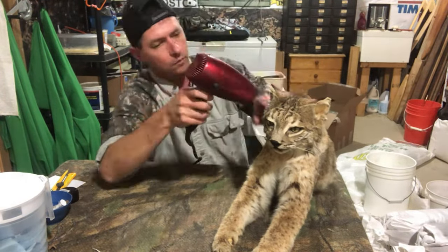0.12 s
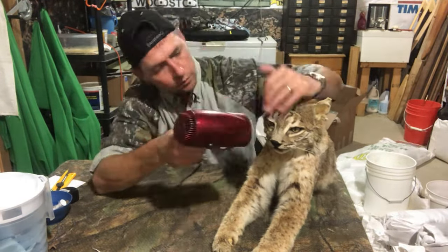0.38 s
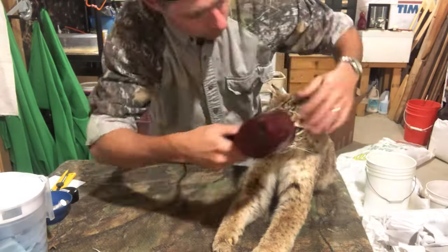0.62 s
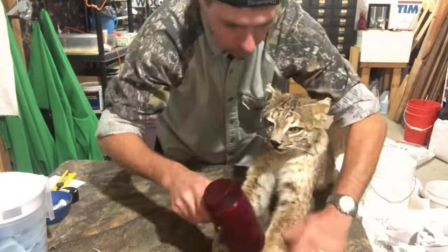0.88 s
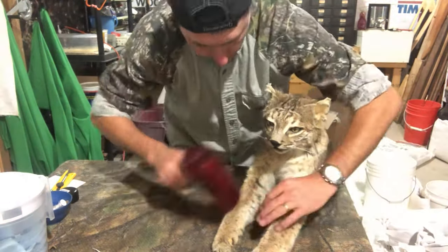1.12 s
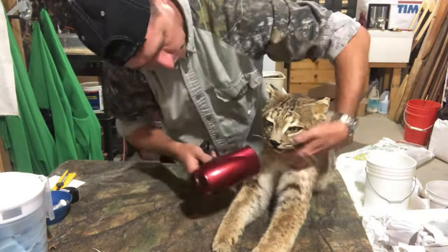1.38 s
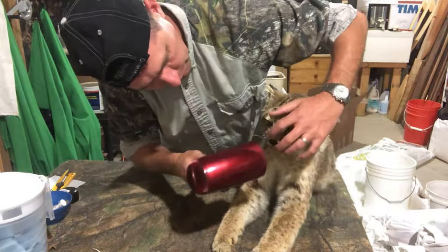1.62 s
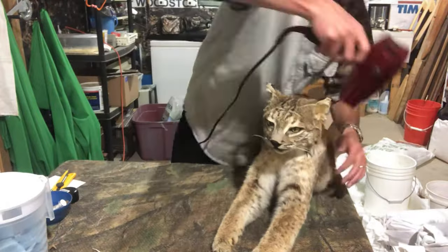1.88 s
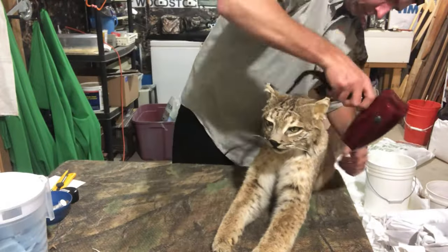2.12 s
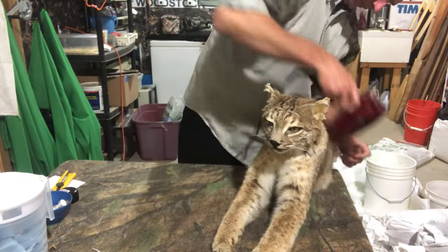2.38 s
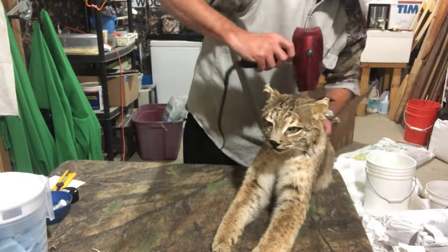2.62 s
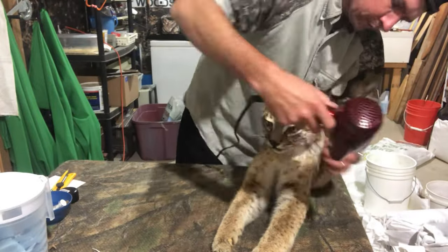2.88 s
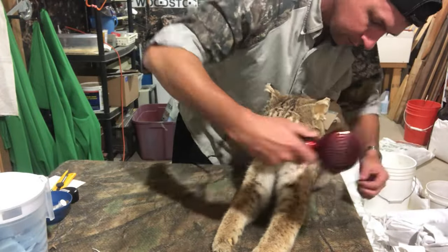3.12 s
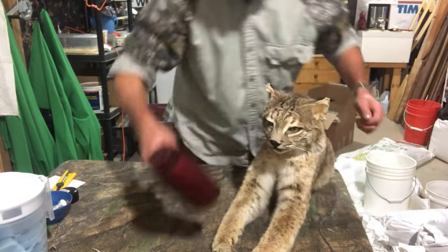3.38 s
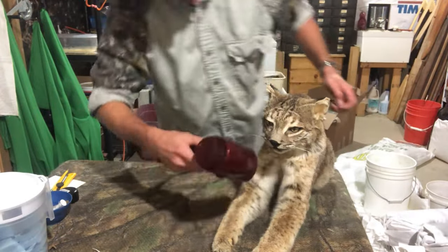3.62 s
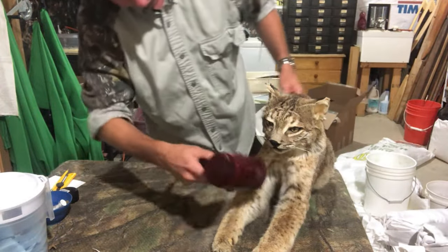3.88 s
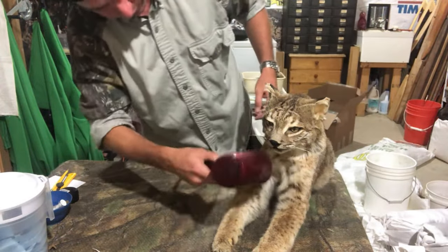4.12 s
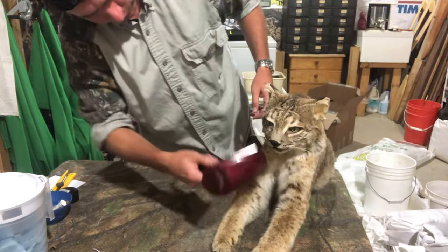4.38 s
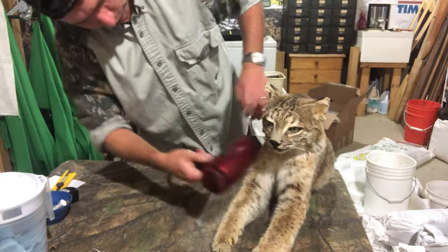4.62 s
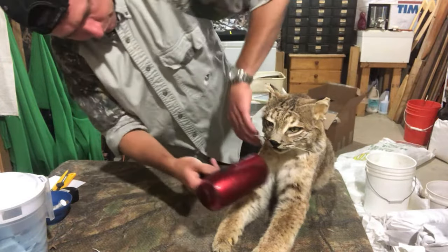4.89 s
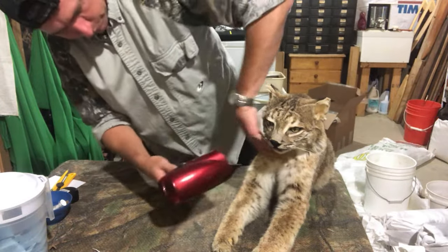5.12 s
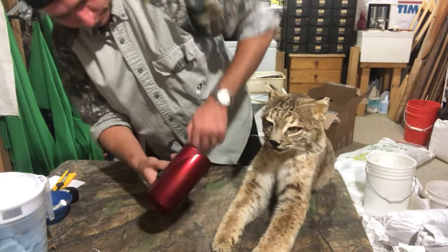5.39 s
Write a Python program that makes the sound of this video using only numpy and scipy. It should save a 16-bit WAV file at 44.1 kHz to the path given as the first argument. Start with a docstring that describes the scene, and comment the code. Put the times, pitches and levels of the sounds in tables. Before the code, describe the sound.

In a workshop, a handheld hair dryer plays greatly sped up: shrill airy hiss, a thin fluttering motor whine near 1.7 kHz and above, rapid swishes and scattered tiny thumps and cracks. At about 3.4 seconds it cuts hard to natural speed, a fuller, louder roar with a buzzing motor, slowly receding to the end. Single close microphone, mono.

```python
"""A handheld hair dryer is swept over fur in a workshop: shaped noise for its air, fluttering shaft orders
for its motor. Behind it are decaying thumps and cracks on the bench and sine hum from two machines at nearly
the same pitch. The first part plays sped up, over three octaves high; a hard cut drops to natural speed.
One microphone, both channels alike."""
import sys
import numpy as np
from scipy import signal
from scipy.io import wavfile
from scipy.ndimage import uniform_filter1d

SR = 44100
rng = np.random.default_rng(int(sys.argv[2]) if len(sys.argv) > 2 else 0)


def wav_out(sig):
    """Save sig, one row per channel (or a flat mono array), as 16-bit PCM at SR to the path in sys.argv[1]."""
    wavfile.write(sys.argv[1], SR, np.round(np.clip(np.atleast_2d(sig).T, -1, 1) * 32767).astype(np.int16))


def volts(x):
    """Linear amplitude factor 10**(x/20) for a level x in dB, scalar or array-like."""
    e = np.asarray(x, float) / 20
    return 10 ** e


N = 242991

CUT_S, SPEED_UP = 3.3965, 8.6  # cut to natural speed; playback factor before it

# Shop hum partials at natural speed: a close pair and three overtones, in Hz; levels before the cut, in dB.
HUM_HZ = (59.0, 59.18, 120.1, 175.95, 240.8)
HUM_DB = (-72.5, -73.5, -77, -73, -74)
HUM_SILENT_S = 3.0  # the two machines cancel here

# Thumps on the bench, sped up. Each row: start in seconds, peak in dB, ring in Hz.
THUMPS = [(0.45, -50, 960), (0.496, -57, 1000), (0.593, -43, 740), (0.605, -43, 850), (0.741, -51.5, 820),
          (0.838, -49, 1090), (0.952, -46, 860), (0.96, -40, 814), (0.978, -38.5, 740), (1.021, -45, 724),
          (1.037, -36, 790), (1.044, -38.5, 880), (1.078, -37.5, 880), (1.104, -34, 840),
          (1.132, -35.5, 860), (1.158, -26.5, 913), (1.452, -41.5, 784), (1.476, -41.5, 760),
          (1.74, -43, 890), (1.899, -41, 940), (2.663, -54, 842), (2.687, -54, 705)]
# Bench answers to each thump. Each row: nominal delay in seconds, nominal level re the thump in dB.
BOUNCES = [(.0045, -11), (.0095, -16), (.016, -25)]
# Cracks of hard contacts, sped up. Each row: start in seconds, noise level before decay in dB, centre in Hz.
CRACKS = [(0.45, -39.5, 2700), (0.592, -32, 2900), (0.837, -46, 1980), (0.96, -45, 1500),
          (0.978, -47, 1500), (1.044, -40, 2090), (1.156, -45, 1500), (1.474, -48, 1440),
          (1.898, -35.5, 1860)]

# Housing roar colour, sped up and natural. Each row: frequency in Hz, relative level per Hz in dB.
FAST_ROAR_COLOUR = [(150, -43.5), (450, -32), (600, -29.5), (1270, -25), (1500, -20.5), (3150, -15.5),
                    (3450, -10), (5000, -9.5), (5600, -12.5), (6100, -5), (6900, -3), (8500, -21.5),
                    (15600, -26.5)]
SLOW_ROAR_COLOUR = [(18, -64), (45, -43), (65, -25), (115, -23.5), (192, -23), (390, -11), (700, -9),
                    (1000, -8), (1600, -8), (2500, -11.5), (4000, -12.5), (12300, -22.5), (15600, -28.5)]
# Resonances of housing and shop, before speed scaling. Each row: frequency in Hz, width in Hz, gain in dB.
RESONANCES = [(323, 14, -4), (463, 12, 3), (712, 20, 0), (1023, 30, 0), (1244, 40, -3), (4000, 250, 0)]
MOVING_RESONANCES_DB = -20  # quick sweeping smears the resonances

# Nozzle sweeps, sped up. Each row: time in seconds, jet level in dB, jet centre in Hz,
# housing turn toward the microphone (0 away, about 1 toward).
SWEEPS = [(0.0, -40, 7840, 0), (0.2, -38, 8320, 0.2), (0.58, -37, 8700, 0.41), (0.78, -39, 9000, 0.59),
          (0.9, -44, 10100, 0.94), (1.12, -44, 9500, 0.87), (1.2, -47, 8700, 0.86),
          (1.33, -41.5, 10700, 0.96), (1.43, -49.5, 10200, 1.06), (1.55, -48, 8500, 0.72),
          (1.59, -41.5, 8950, 0.7), (1.74, -41.5, 9600, 0.41), (1.79, -45, 9300, 0.73),
          (1.84, -38, 9200, 0.44), (1.97, -39, 7700, .4), (2.07, -39, 9300, 0.38), (2.22, -42, 8700, 0.4),
          (2.3, -43, 9250, 0.5), (2.38, -46.5, 9800, 0.44), (2.47, -45.5, 8460, 0.4),
          (2.52, -41, 8500, 0.3), (2.66, -40.5, 8000, 0.12), (2.8, -39.5, 8450, 0.2),
          (2.86, -42, 10300, 0.95), (2.93, -43.5, 9800, 0.57), (3.0, -41, 8400, 0.68),
          (3.1, -41.5, 9100, 0.72), (3.17, -38.5, 9000, 0.53), (3.24, -39.5, 9000, 0.72),
          (3.3, -49, 9800, 0.73), (3.38, -38.5, 9300, 0.79)]
# Jet brushing close over fur, hiss swells. Each row: start in seconds, length in seconds, hiss gain in dB.
BRUSHES = [(0.4, 0.093, 3.5), (1.112, 0.4, 3), (1.556, .31, 6), (2.665, 0.047, 3.5), (2.976, 0.053, 3),
           (3.16, 0.3, 2.5)]
BRUSH_EDGE_S = 0.025
ROAR_AWAY_DB, ROAR_TURN_DB = -54.5, 10.5  # turned away; gain when turned toward
HISS_DB, HISS_TURN_DB = -55, 5
HISS_FOLLOWS, JET_USUAL_DB = 0.35, -42  # share of the jet's dB swings that the hiss follows

# Natural speed: the dryer draws away while the nozzle closes in on the fur and the jet rises in pitch.
SLOW_ROAR_DB, SLOW_JET_DB, SLOW_HISS_DB, RECEDE_DB_PER_S = -40, -43, -65, -1.07
SLOW_JET_HZ, JET_RISE_OCTAVES_PER_S = 1055, 0.56
LULL_S, LULL_WIDTH_S, LULL_DB = 3.58, 0.037, -12  # the jet drops briefly

# Shaft speed as heard, sped up. Each row: time in seconds, speed in Hz.
FAST_SHAFT = [(0.0, 1703), (0.56, 1706), (1.12, 1699), (1.68, 1716), (2.24, 1704), (2.8, 1704.5),
              (3.36, 1711)]
SLOW_SHAFT_HZ = 197.9
# Shaft orders besides the blade whine, as multiples of shaft speed.
FAST_ORDERS = (1, 7, 2, 3, 5, 6, 8)
SLOW_ORDERS = (1, 5, 2, 3, 6, 7, 8, 12)
# Their levels in dB, before nearness, receding and surge.
FAST_ORDERS_DB = [-57, -53, -61.5, -63.5, -51, -57, -73.5]
SLOW_ORDERS_DB = [-54.5, -50, -56, -57, -63, -63, -53, -57]
# Motor, sped up. Each row: time in seconds, nearness gain in dB, blade whine as the intake turns in dB.
FAST_MOTOR = [(0.0, -2, -49), (0.4, -1.5, -40), (0.62, -0.5, -48), (0.72, -2, -42), (0.8, -2.5, -52.5),
              (1.0, 1.5, -38.5), (1.2, -1, -45), (1.34, 1, -57), (1.44, -3.5, -42.5), (1.55, -0.5, -55),
              (1.74, 1.5, -48), (1.84, -0.5, -62), (1.92, 1, -37.5), (2.1, -3.5, -50), (2.45, -4.5, -47.5),
              (2.72, -2.5, -51), (2.96, -2.5, -46), (3.04, -2.5, -39), (3.12, .5, -47), (3.22, -1, -42.5),
              (3.38, -3.5, -48)]
# Blade whine at natural speed. Each row: time in seconds, level in dB.
SLOW_WHINE = [(3.4, -46.5), (3.56, -48), (3.72, -40), (4.45, -43), (4.95, -45), (5.2, -51), (5.5, -53)]
WHINE_ORDER, SURGE_ORDER = 4, 5
SURGE_DB, SURGE_S = 16, 0.084  # the surge's dB excess falls to 1/e in SURGE_S


def evened(x):
    """Scales to rms 1."""
    return x / np.sqrt(np.mean(abs(x) ** 2) + 1e-20)


def columns(rows, t_s):
    """Interpolates every column of a curve table at the given times."""
    row_s, *values = np.transpose(rows)
    return [np.interp(t_s, row_s, v) for v in values]


def add(mix, start_s, sound):
    """Adds a sound into the mix."""
    part = mix[round(start_s * SR):][:len(sound)]
    part += sound[:len(part)]


def hum():
    """Two machines beat slowly against each other; the shop's clock runs fast before the cut."""
    t_s = np.arange(N) / SR
    clock_s = np.minimum(t_s, CUT_S) * SPEED_UP + np.maximum(t_s - CUT_S, 0)
    clock_s = clock_s - HUM_SILENT_S * SPEED_UP
    out = np.zeros(N)
    for i, (hz, db) in enumerate(zip(HUM_HZ, HUM_DB)):
        sign = (-1) ** i  # neighbours opposed
        out += sign * np.sqrt(2) * volts(db) * np.sin(2 * np.pi * hz * clock_s)
    return out


def thumps():
    """Each blow rings the bench for a few rounded cycles, then bounces quickly."""
    out, t_s = np.zeros(N), np.arange(2000) / SR - 0.0016
    chances = rng.uniform(-1, 1, (len(THUMPS), 2 * len(BOUNCES)))
    for (start_s, peak_db, ring_hz), chance in zip(THUMPS, chances):
        blow = np.exp(-(t_s / 0.0014) ** 2) * np.cos(2 * np.pi * ring_hz * t_s)
        add(out, start_s, volts(peak_db) * blow)
        for (delay_s, bounce_db), late, strong in zip(BOUNCES, chance[::2], chance[1::2]):
            level_db = peak_db + bounce_db + 1.5 * strong
            add(out, start_s + delay_s * (1 + 0.093 * late), volts(level_db) * blow)
    return out


def cracks():
    """Hard contacts burst into band-limited noise with a fast and a slow decay."""
    out, t_s = np.zeros(N), np.arange(2000) / SR
    attack = np.minimum(t_s / 0.0015, 1)
    decay = volts(-60 * t_s / 0.022) + volts(-11 - 60 * t_s / 0.08)
    for start_s, db, centre_hz in CRACKS:
        band = signal.butter(2, [0.7 * centre_hz, 1.6 * centre_hz], "bandpass", fs=SR)
        noise = evened(signal.lfilter(*band, rng.standard_normal(len(t_s))))
        add(out, start_s, volts(db) * noise * attack * decay)
    return out


def air(levels, roar_colour, bands_hz, hiss_hz, patchy_db, streaky_db, speed, resonances_db, size):
    """Turbulent noise: housing roar, a jet hump that moves as the nozzle turns, and hiss on top."""
    hop = size // 4
    hz = np.fft.rfftfreq(size, 1 / SR)[:, None] + 1
    frames = N // hop + 5
    roar_db, jet_db, jet_hz, hiss_db = levels(np.arange(frames) * hop / SR)

    colour_hz, colour_db = np.transpose(roar_colour)
    roar = volts(np.interp(np.log(hz), np.log(colour_hz), colour_db)) + 0 * jet_hz
    jet = np.exp(-(np.log2(hz / jet_hz) / 0.36) ** 2)  # half-width in octaves
    hiss = 1 / (1 + (hiss_hz / hz) ** 8) + 0 * jet_hz
    power = 0
    for shape, level_db, (lo_hz, hi_hz) in zip((roar, jet, hiss), (roar_db, jet_db, hiss_db), bands_hz):
        inside = (hz[:, 0] > lo_hz) & (hz[:, 0] < hi_hz)
        band_power = (shape[inside] ** 2).sum(0)  # the level refers to the layer's own band
        power = power + shape ** 2 / band_power * volts(2 * level_db)

    # the low roar reaches the microphone through the room and follows the nozzle only about half as much
    low = 1 / (1 + (hz / speed / 370) ** 8)
    power = power * volts(2 * 0.53 * (roar_db.mean() - roar_db) * low)
    for ring_hz, width_hz, gain_db in RESONANCES:
        detune = 2 * (hz / speed - ring_hz) / width_hz
        power = power * (1 + volts(2 * (gain_db + resonances_db)) / (1 + detune ** 2))

    real, imag, patches, streaks = rng.standard_normal((frames, len(hz), 4)).T
    # reflections colour the noise for a while
    streaks = evened(uniform_filter1d(uniform_filter1d(streaks, size=2, axis=0), size=70, axis=1))
    patches = evened(uniform_filter1d(uniform_filter1d(patches, size=10, axis=0), size=12, axis=1))
    uneven = volts(patchy_db * patches + streaky_db * streaks)
    spectrum = (real + 1j * imag) * np.sqrt(power) * uneven
    return signal.istft(spectrum, nperseg=size, noverlap=size - hop)[1][:N] * np.sqrt(3 / 2)


def fast_air_levels(t_s):
    """Roar, jet, jet centre and hiss as the nozzle sweeps and brushes the fur."""
    jet_db, jet_hz, turned = columns(SWEEPS, t_s)
    hiss_db = HISS_DB + HISS_TURN_DB * turned + HISS_FOLLOWS * (jet_db - JET_USUAL_DB)
    for start_s, length_s, gain_db in BRUSHES:
        inside_s = np.minimum(t_s - start_s, start_s + length_s - t_s)
        hiss_db = hiss_db + gain_db * np.clip(inside_s / BRUSH_EDGE_S + 0.5, 0, 1)
    return ROAR_AWAY_DB + ROAR_TURN_DB * turned, jet_db, jet_hz, hiss_db


def slow_air_levels(t_s):
    """All layers recede together; the jet glides upward."""
    since_s = np.maximum(t_s - CUT_S, 0)
    away_db = RECEDE_DB_PER_S * since_s
    lull_db = LULL_DB * np.exp(-((t_s - LULL_S) / LULL_WIDTH_S) ** 2)
    jet_hz = SLOW_JET_HZ * 2 ** (JET_RISE_OCTAVES_PER_S * since_s)
    return SLOW_ROAR_DB + away_db, SLOW_JET_DB + away_db + lull_db, jet_hz, SLOW_HISS_DB + away_db


def fast_air():
    """Sped-up air follows the sweeping nozzle."""
    return air(fast_air_levels, FAST_ROAR_COLOUR, [(3550, 6550), (7100, 20000), (12200, 14250)],
               hiss_hz=9700, patchy_db=1.3, streaky_db=2.5, speed=SPEED_UP,
               resonances_db=MOVING_RESONANCES_DB, size=1024)


def slow_air():
    """Natural-speed air recedes, with its resonances in full."""
    return air(slow_air_levels, SLOW_ROAR_COLOUR, [(2700, 10000), (850, 4700), (8050, 13000)],
               hiss_hz=10000, patchy_db=1.16, streaky_db=2.05, speed=0.98, resonances_db=0, size=2048)


def motor(shaft_hz, levels_db, orders, width_hz, clean):
    """Shaft orders; flutter widens each line in step with its order."""
    turn_rad = 2 * np.pi * np.cumsum(shaft_hz * np.ones(N)) / SR
    out = np.zeros(N)
    for order, db in zip(orders, levels_db):
        pole = np.exp(-np.pi * width_hz * order / SR)
        drift = rng.standard_normal((N, 2)) @ [1, 1j]
        drift = evened(signal.lfilter([1], np.convolve([1, -pole], [1, -pole]), drift))
        steady = np.clip(clean / np.sqrt(order), 0, 1)  # power share without flutter
        flutter = np.sqrt(steady) + np.sqrt(1 - steady) * drift
        phase_rad = order * turn_rad + 2 * np.pi * rng.random()
        out += volts(db) * np.sqrt(2) * (flutter * np.exp(1j * phase_rad)).real
    return out


def fast_motor(t_s):
    """Orders follow the distance; the blade whine comes and goes with the intake."""
    near_db, whine_db = columns(FAST_MOTOR, t_s)
    levels_db = [whine_db] + [db + near_db for db in FAST_ORDERS_DB]
    shaft_hz, = columns(FAST_SHAFT, t_s)
    return motor(shaft_hz, levels_db, (WHINE_ORDER,) + FAST_ORDERS, width_hz=9, clean=1.35)


def slow_motor(t_s):
    """Orders recede with the dryer; the fifth dies down from a surge."""
    since_s = np.maximum(t_s - CUT_S, 0)
    away_db = 2.2 * RECEDE_DB_PER_S * since_s
    surge_db = SURGE_DB * np.exp(-since_s / SURGE_S)
    levels_db = columns(SLOW_WHINE, t_s)
    for order, db in zip(SLOW_ORDERS, SLOW_ORDERS_DB):
        levels_db.append(db + away_db + surge_db * (order == SURGE_ORDER))
    return motor(SLOW_SHAFT_HZ, levels_db, (WHINE_ORDER,) + SLOW_ORDERS, width_hz=8, clean=1.15)


def scene():
    """Sped-up dryer and bench up to the cut, natural dryer after it, hum throughout."""
    t_s = np.arange(N) / SR
    fast = fast_air() + fast_motor(t_s) + thumps() + cracks()
    # the microphone's bass cut is sped up too
    bass_cut = signal.butter(3, 400, "highpass", fs=SR, output="sos")
    fast = signal.sosfilt(bass_cut, fast)
    slow = slow_air() + slow_motor(t_s)
    after = np.clip((t_s - CUT_S) / 0.00084 + 0.5, 0, 1)
    dryer = (1 - after) * fast + after * slow
    shop = volts(2.5 * after) * hum()  # a little louder after the cut
    return np.tile(dryer + shop, (2, 1))


def band_limit(x):
    """A steep low-pass at the top of the band."""
    return signal.sosfilt(signal.butter(12, 15740, fs=SR, output="sos"), x)


def record(dry):
    """Passes on the finished mix, both channels alike."""
    return band_limit(dry)


dry = scene()
out = record(dry)
wav_out(out)
```